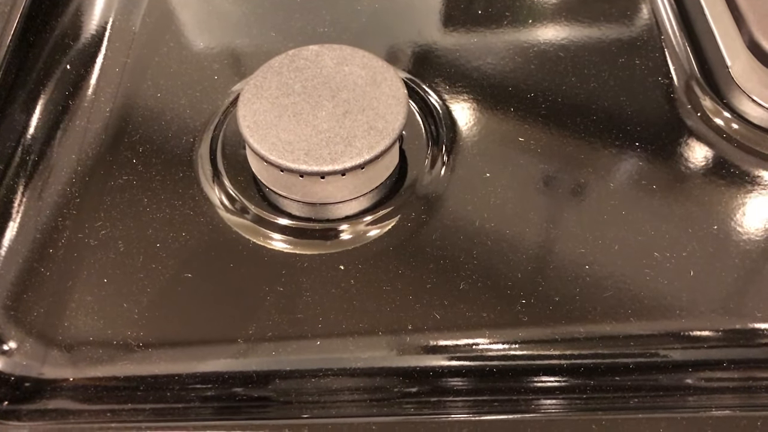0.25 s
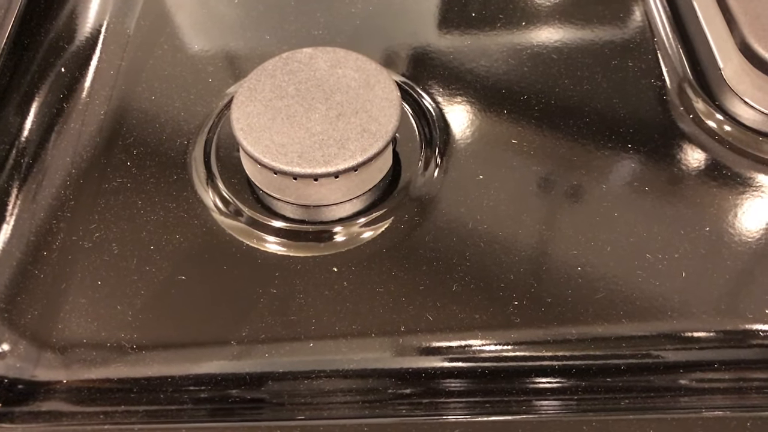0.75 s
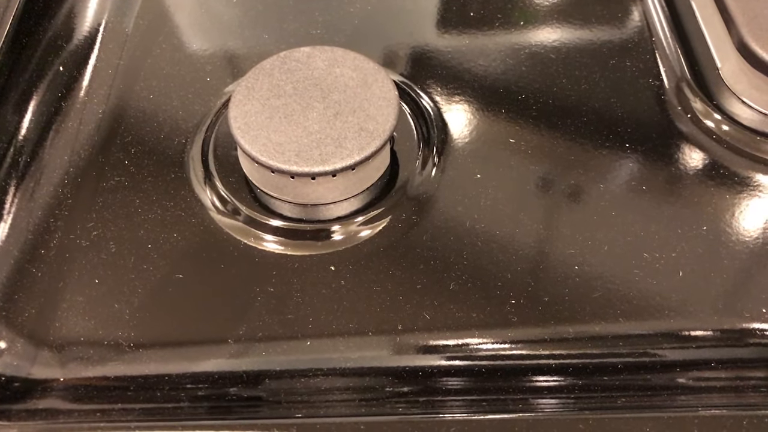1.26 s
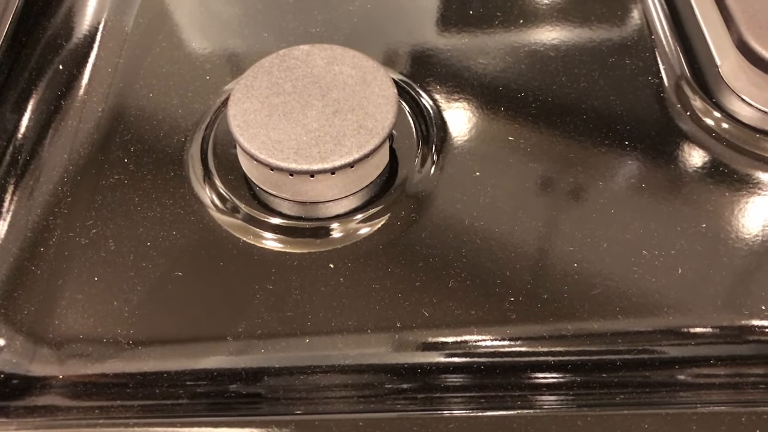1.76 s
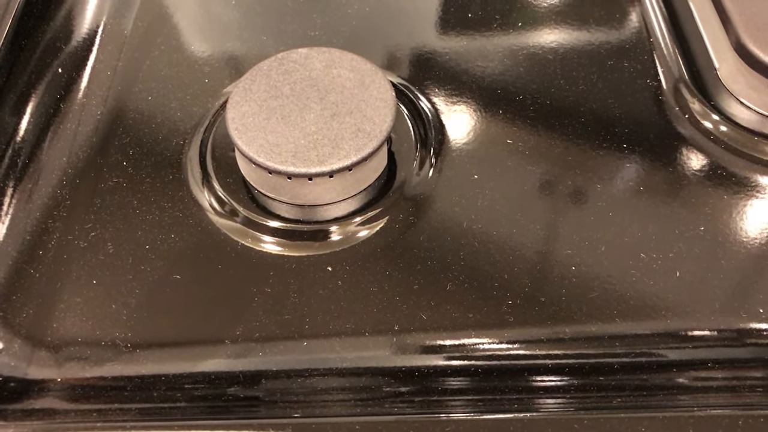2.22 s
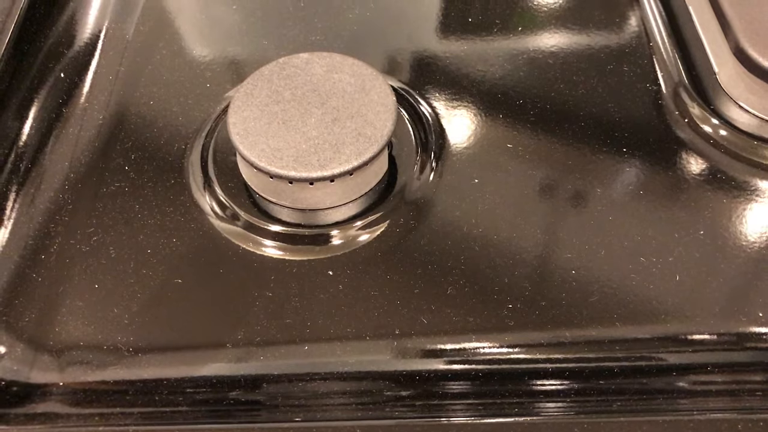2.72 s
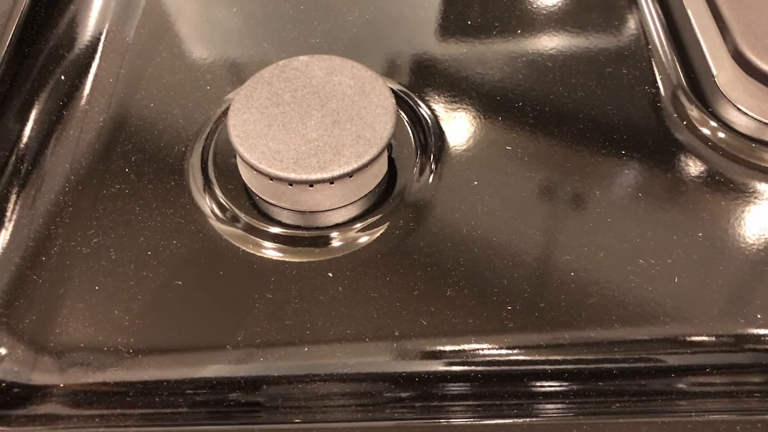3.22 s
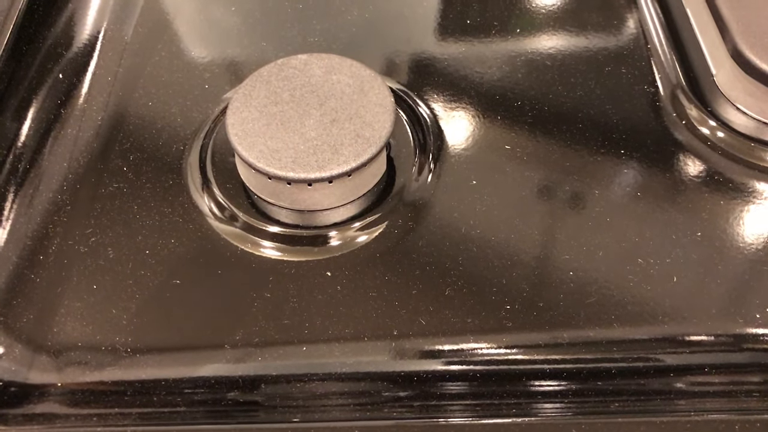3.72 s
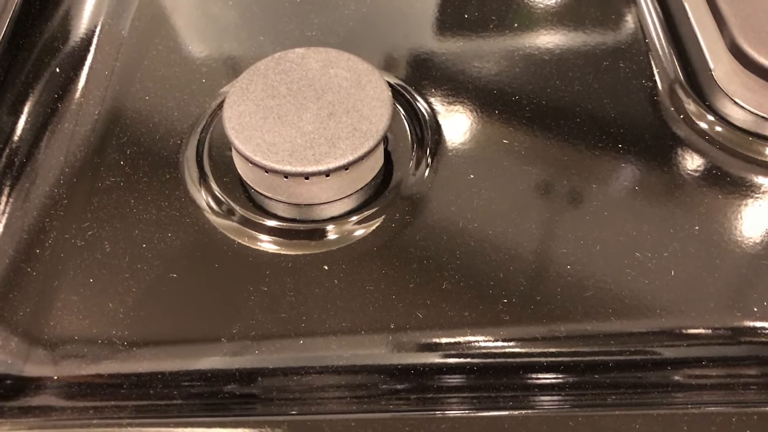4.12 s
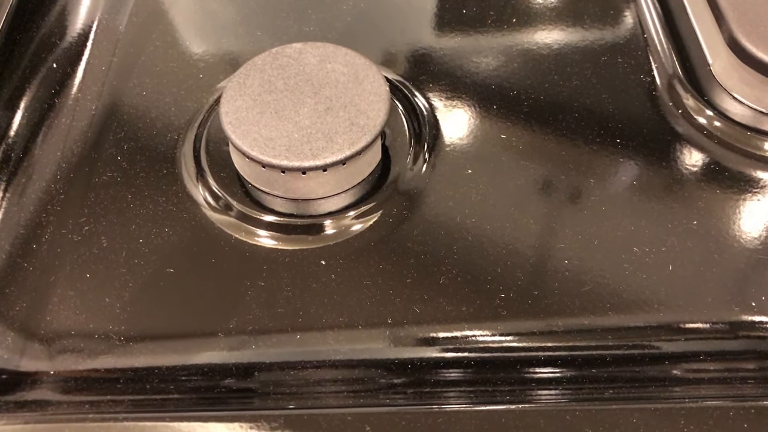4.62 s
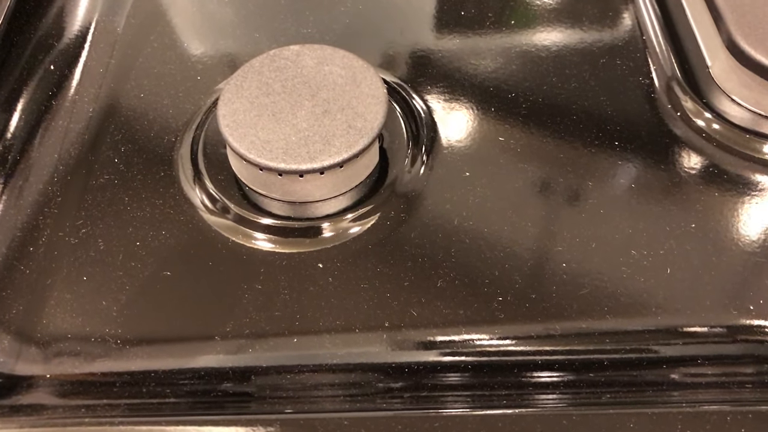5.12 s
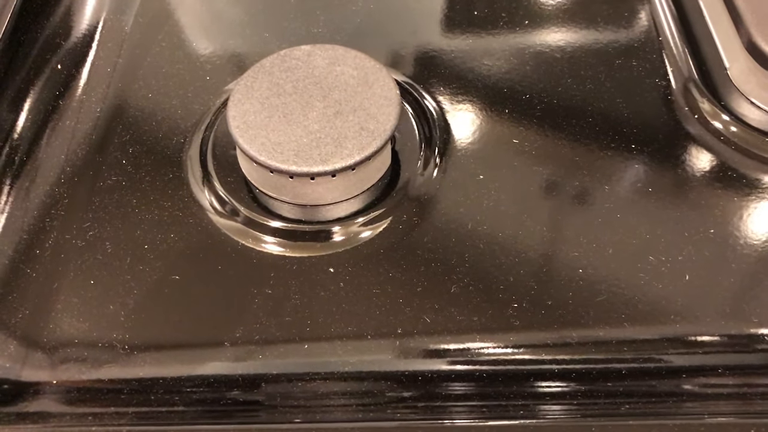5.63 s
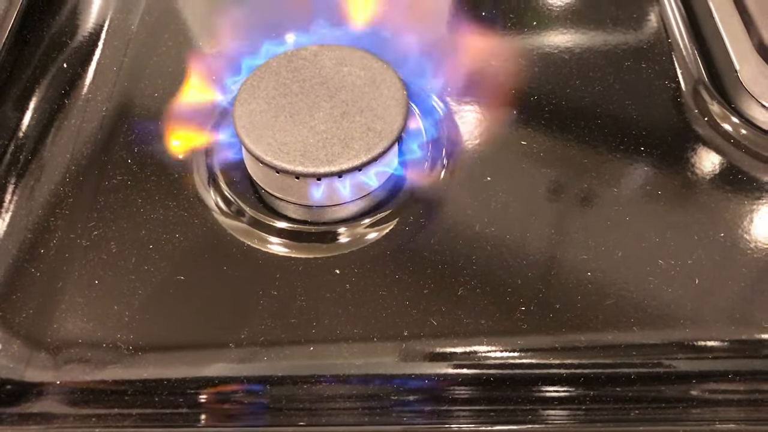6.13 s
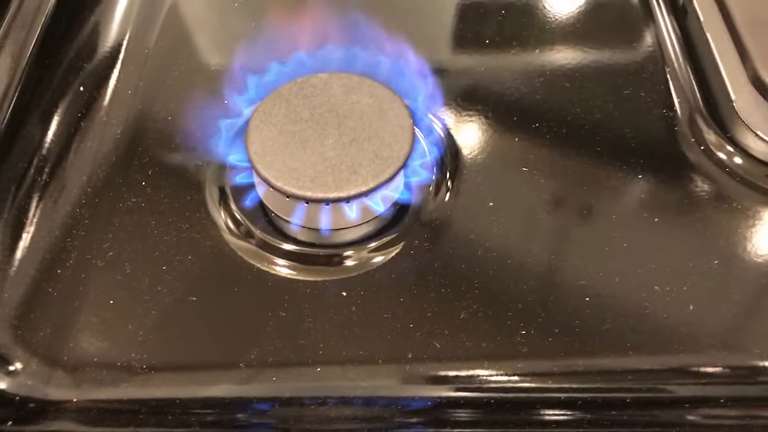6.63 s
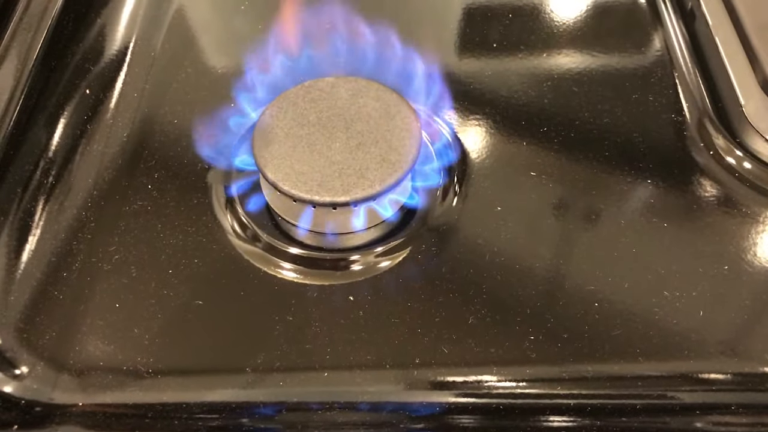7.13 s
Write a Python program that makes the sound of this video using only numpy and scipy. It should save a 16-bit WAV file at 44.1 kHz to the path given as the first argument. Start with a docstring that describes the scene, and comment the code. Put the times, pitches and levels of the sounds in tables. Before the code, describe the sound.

Sharp, quick spark ticks from a gas stove pause and resume, until the gas lights with a soft sputtering puff and a low rush.

```python
"""A hard-walled kitchen, one hand-held microphone close to a gas hob.
The igniter ticks six times a second, in two runs. Each spark cracks, bounces off the steel top
and rings on in the burner and the room. Gas slowly fills the line, catches with a soft sputtering
whoomp, and burns with a low flutter and a thin hiss. Under it lie room tone and a faint draught."""
import sys
import numpy as np
from scipy import signal
from scipy.fft import rfft, irfft, next_fast_len
from scipy.io import wavfile

SR = 44100
rng = np.random.default_rng(int(sys.argv[2]) if len(sys.argv) > 2 else 0)


def wrap_up_sound(samples):
    """Save the sound to the file named by the first command line argument, as 16-bit audio."""
    columns = np.atleast_2d(samples).T
    # keep every value between -1 and 1, then stretch to whole-number steps
    tamed = np.clip(columns, -1, 1)
    steps = np.round(tamed * 32767).astype(np.int16)
    wavfile.write(sys.argv[1], SR, steps)


N = 324612
TIME, RING_TIME = np.arange(N) / SR, np.arange(SR // 2) / SR
CATCH_S = 6.089  # the gas catches


def igniter(crack_db=10, room_db=7.5, lit_db=-0.2, air_puff_db=-26, gas_puff_db=-10, lit_puff_db=-3,
            wander=0.099, air_smear=0.121, lit_smear=0.5, sway_hz=0.097):
    """Sparks at close range: each arc takes a slightly different path, and richer gas puffs more."""
    # colour of the sound scattered round the kitchen: f/Hz, level/dB
    scatter = [(150, -37.5), (400, -39), (700, -21.5), (1500, -19), (2200, -14.5), (2900, -11), (3700, -11),
               (4500, -3.5), (5400, -3.5), (6300, -1), (8800, -1.5), (10000, 1.5), (12000, -2.5),
               (14600, -5), (15500, -15.5)]
    snap, ring, push = gain_of(crack_db) * crack(), burner_ring(), puff()
    tail_a, tail_b = (gain_of(room_db) * unit(coloured(room_tail(), scatter)) for _ in range(2))
    out = np.zeros(N)
    for s, db in sparks():
        lit = s > CATCH_S  # the flame's hot, moving air smears the snap and leaves less gas to puff
        direct = gain_of(lit_db * lit) * smeared(snap, lit_smear if lit else air_smear)
        turn = 2 * np.pi * sway_hz * s  # the microphone drifts through the room's echo pattern
        response = direct + ring + np.cos(turn) * tail_a + np.sin(turn) * tail_b
        puff_db = air_puff_db + (gas_puff_db - air_puff_db) * gas_share(s) + lit_puff_db * lit
        tick = smeared(response, wander, taps=64) + gain_of(puff_db) * push
        add(out, s, gain_of(db) * tick)
    return out


def sparks(recharge_s=0.16745, first_lag_s=0.0014):
    """Time and level of each spark: one per recharge, the first recharge of a burst a little longer."""
    # bursts of up to five sparks: start t/s, spark count, level/dB
    bursts = [(0.5327, 1, -9.5), (0.713, 5, -10), (1.564, 5, -10), (2.3995, 3, -9.5), (3.6832, 5, -9.4),
              (4.5341, 5, -9.2), (5.3852, 5, -9), (6.236, 5, -9.5), (7.0874, 1, -9)]
    return [(start + k * recharge_s + first_lag_s * (k > 0), db)
            for start, count, db in bursts for k in range(round(count))]


def crack(snap_db=-4):
    """The arc snaps and the gap under the burner cap rings briefly; both arrive by a few short paths."""
    # paths to the microphone, round the cap and off the hob: delay t/s, ring level/dB, snap level/dB
    paths = [(.0005, -5, -8.5), (.0009, 4, 15), (.0012, -15.5, -3), (.0017, 10.5, -11), (.0025, -13.5, -25),
             (.0036, -7, -22), (.0055, 6, -23), (.0059, 1.5, 2), (.0074, 1.5, -16.5)]
    # resonances of the gap under the cap: f/Hz, width/Hz, level/dB
    gap_modes = [(2040, 170, -6.5), (2447, 200, -13.5), (2862, 59, 3.5), (4080, 150, -4), (4370, 430, 2),
                 (5450, 480, 1.5), (6514, 360, 12.5), (7070, 423, 11.5), (8000, 170, 1), (8310, 330, 12),
                 (9580, 320, 12), (10420, 490, 10), (11960, 1370, 5.5), (13760, 1100, 5), (15850, 620, 5.5)]
    # colour of the bare snap: f/Hz, level/dB
    snap_colour = [(150, -36), (400, -24.5), (720, -9.5), (1200, -28.5), (2000, -11.5), (2800, -9),
                   (4200, -8), (7000, -5), (11500, 0), (16000, -29)]
    ring_arrivals, snap_arrivals = np.zeros((2, len(RING_TIME)))
    for delay, ring_db, bright_db in paths:
        add(ring_arrivals, delay, gain_of([ring_db]))
        add(snap_arrivals, delay, gain_of([bright_db]))
    t = RING_TIME[:SR // 50]
    gap = sum((-1) ** k * gain_of(db) * width * np.exp(-np.pi * width * t) * np.sin(2 * np.pi * hz * t)
              for k, (hz, width, db) in enumerate(gap_modes))
    ring = unit(signal.fftconvolve(ring_arrivals, gap)[:len(RING_TIME)])
    snap = unit(coloured(snap_arrivals, snap_colour))
    return unit(ring + gain_of(snap_db) * snap)


def burner_ring(t60_s=0.23):
    """The metal rings faintly after the snap."""
    # long modes of the burner and its steel top: f/Hz, level/dB
    modes = [(4727, -62.5), (6223, -61.5), (6449, -62.5), (6821, -116.5), (7117, -54.5), (7553, -56.5),
             (8118, -49), (8339, -80.5), (8414, -55), (8640, -49.5), (9022, -56), (9728, -47),
             (9798, -75.5), (9911, -57.5), (10115, -71.5), (10287, -69), (10492, -73), (10960, -48.5),
             (12032, -68.5), (12699, -61.5)]
    ring = sum(gain_of(db) * np.sin(2 * np.pi * (hz * RING_TIME + rng.random())) for hz, db in modes)
    return unit(ring * gain_of(-60 * RING_TIME / t60_s))


def puff(echo_db=-4, t60_s=0.043):
    """Gas heated by the spark swells: one soft push and its echoes off the hob."""
    # hollow colour of the puff: f/Hz, level/dB
    colour = [(100, -32.5), (330, -11.5), (430, -5.5), (560, -10.5), (740, 9.5), (950, -5.5), (1600, -10.5),
              (2400, -18.5), (4000, -22.5)]
    decay = gain_of(-60 * RING_TIME / t60_s)
    arrivals = gain_of(echo_db) * unit(rng.standard_normal(len(RING_TIME)) * decay)
    arrivals[0] += 1  # the direct push
    return unit(coloured(arrivals, colour))


def flame(burn_db=-49.5, stand_s=6.26, room_db=-6):
    """A deep whoomp as the pooled gas flares off, a short lull, then the ring of flames stands up."""
    # three quick surges of the flare: t/s, level/dB
    surges = [(6.087, -45), (6.122, -43.5), (6.176, -43.5)]
    # spectrum of the whoomp: f/Hz, level/dB
    whoomp_colour = [(30, -5), (65, -12), (100, -2.5), (135, 5), (200, 1), (240, -18), (280, 8.5),
                     (365, -30), (510, -3.5), (700, -3), (900, -14.5), (1350, -11), (1700, -26),
                     (3000, -26), (8000, -43)]
    # spectrum of the settled flame: f/Hz, level/dB
    settled_colour = [(30, -20), (90, -5.5), (135, 4.5), (215, -0.5), (250, -2.5), (290, -0.5), (365, -5),
                      (510, 2.5), (610, -4.5), (730, 1.5), (900, -8), (1300, -8), (1800, -20.5),
                      (3000, -22), (8000, -51)]
    drive = turbulence()
    flare_power = sum((gain_of(db) * envelope(s, attack_s=0.008, hold_s=0.021, fall_db_per_s=220)) ** 2
                      for s, db in surges)
    whoomp = np.sqrt(flare_power) * evened(coloured(drive, whoomp_colour))
    settled = gain_of(burn_db) * envelope(stand_s, attack_s=0.16, hold_s=0, fall_db_per_s=1.7)
    burn = whoomp + settled * evened(coloured(drive, settled_colour))
    return burn + gain_of(room_db) * signal.fftconvolve(burn, room_tail())[:N]


def turbulence(pops_per_s=550, spread_db=4, roar_db=-5):
    """Flamelets pop at the ports over a turbulent roar."""
    sizes = gain_of(spread_db * np.minimum(rng.exponential(1, N), 3.5))
    crackle = sizes * (rng.random(N) < pops_per_s / SR)
    return evened(crackle - crackle.mean()) + gain_of(roar_db) * rng.standard_normal(N)


def pops(decay_s=0.00029):
    """A pocket of gas burns at once: a quick push of air and a shallow suck behind it."""
    # the flame's largest pops: t/s, peak level/dB
    pockets = [(6.0991, -34), (6.133, -31), (6.182, -32), (6.1919, -31.5), (7.2433, -35)]
    age = RING_TIME[:SR // 100] / decay_s
    push = age * (1 - age / 2) * np.exp(-age)
    out = np.zeros(N)
    for s, db in pockets:
        add(out, s - decay_s / 2, gain_of(db) * push / push.max())
    return out


def jet(hiss_db=-63, whistle_db=-65, start_s=5.2, rise_s=0.45, whistle_rise_s=2.2):
    """The jet hisses once gas has pushed the air out of the line; its whistle builds more slowly."""
    # spectrum of gas rushing through the jet: f/Hz, level/dB
    hiss_colour = [(1000, -14), (3000, -1.5), (4500, -6), (7000, 3), (9500, -7), (11500, -4), (14000, -4),
                   (16000, -14)]
    # whistling resonances of the jet: f/Hz, width/Hz, level/dB
    modes = [(7240, 350, -6), (9950, 380, 10), (13700, 600, -10)]
    hz = np.fft.rfftfreq(N, 1 / SR)
    peaks = sum(gain_of(db) / (1 + (2 * (hz - centre) / width) ** 2) for centre, width, db in modes)
    whistle = evened(irfft(rfft(rng.standard_normal(N)) * peaks, N))
    whistle *= np.clip((TIME - start_s) / whistle_rise_s, 0, 1)
    hiss = noise(hiss_colour) * np.clip((TIME - start_s) / rise_s, 0, 1)
    return gain_of(hiss_db) * hiss + gain_of(whistle_db) * whistle


def purge(air_hz=2880, gas_hz=3100, width_hz=190, start_db=-86, grow_db_per_s=2.5):
    """Flow noise in a burner-tube resonance: it climbs as gas replaces air, and grows until the catch."""
    hz = air_hz + (gas_hz - air_hz) * gas_share(TIME)
    db = start_db + grow_db_per_s * np.minimum(TIME, CATCH_S)
    flow = rng.standard_normal(N) + 1j * rng.standard_normal(N)
    flutter = signal.lfilter([1], [1, -np.exp(-np.pi * width_hz / SR)], flow)
    tone = np.exp(2j * np.pi * np.cumsum(hz) / SR)
    return gain_of(db) * evened((flutter * tone).real)


def gas_share(s, half_gas_s=4.5, fill_s=0.56):
    """Gas gradually replaces the air in the line: 0 = all air, 1 = all gas, at time s."""
    return 1 / (1 + np.exp((half_gas_s - s) / fill_s))


def room_tail(build_s=0.0008, wall_s=0.018, wall_spread_s=0.0027, wall_db=-3):
    """Dense reflections build quickly, bunched once by the back wall; each band dies at its own rate."""
    # ring time of the kitchen: f/Hz, t60/s
    ring_times = [(400, 0.27), (2000, 0.43), (4500, 0.4), (7500, 0.5), (10000, 0.38), (13000, 0.28),
                  (16000, 0.32)]
    hz, t, bands = signal.stft(rng.standard_normal(len(RING_TIME)), SR, nperseg=256)
    decay = gain_of(-60 * t / read(ring_times, hz)[:, None])
    tail = signal.istft(bands * decay, SR, nperseg=256)[1][:len(RING_TIME)]
    wall = gain_of(wall_db) * np.exp(-((RING_TIME - wall_s) / wall_spread_s) ** 2)
    return unit(tail * (1 - np.exp(-RING_TIME / build_s) + wall))


def background(floor_db=-60, draught_db=-47, gust_db=-35.5):
    """Low room tone, and air drifting over the microphone, with a gust as the gas catches."""
    # steady rush of the room and the open line: f/Hz, level/dB
    room_tone = [(25, 9.5), (48, 13), (70, -7), (110, 4.5), (135, -3), (215, 2.5), (400, -2), (700, -2),
                 (1100, -5.5), (1500, -15.5), (2300, -23.5), (4000, -26), (10000, -27.5), (16000, -32.5)]
    # rumble of the draught on the microphone: f/Hz, level/dB
    draught_colour = [(1, -6), (5, 3), (9, -2), (20, -13.5), (32, -29), (70, -53), (200, -93.5)]
    gust = gain_of(gust_db) * envelope(CATCH_S, attack_s=0.03, hold_s=0.2, fall_db_per_s=22)
    return gain_of(floor_db) * noise(room_tone) + (gain_of(draught_db) + gust) * noise(draught_colour)


def gain_of(db):
    """Decibels to a factor."""
    return 10 ** (np.asarray(db) / 20)


def evened(x):
    """Scales to rms 1."""
    return x / np.sqrt(np.mean(x ** 2) + 1e-20)


def unit(x):
    """Scales to energy 1."""
    return x / np.linalg.norm(x)


def read(points, hz):
    """Interpolates a table on a log-frequency axis."""
    f, value = np.transpose(points)
    return np.interp(np.log(hz + 1), np.log(f + 1), value)


def add(mix, s, sound):
    """Mixes a sound in at time s."""
    part = mix[round(s * SR):][:len(sound)]
    part += sound[:len(part)]


def coloured(x, points):
    """Causal, minimum-phase filter with the given spectrum."""
    size = 2 * next_fast_len(len(x))
    log_gain = np.log(gain_of(read(points, abs(np.fft.fftfreq(size, 1 / SR)))))
    response = np.exp(np.conj(signal.hilbert(log_gain)))[:size // 2 + 1]
    return irfft(rfft(x, size) * response, size)[:len(x)]


def noise(points):
    """Steady noise of rms 1 with the given spectrum."""
    return evened(coloured(rng.standard_normal(N), points))


def envelope(start_s, attack_s, hold_s, fall_db_per_s):
    """A straight rise, then an exponential release from hold_s after the start."""
    age = TIME - start_s
    return np.clip(age / attack_s, 0, 1) * gain_of(-fall_db_per_s * np.maximum(age - hold_s, 0))


def smeared(x, share, taps=110):
    """Spreads part of a sound over random, slightly longer paths."""
    arrivals = unit(np.r_[1, share * unit(rng.standard_normal(taps))])
    return signal.fftconvolve(x, arrivals)[:len(x)]


def scene():
    """Sparks, flame, gas flow and kitchen at one close microphone."""
    return (igniter() + flame() + pops() + jet() + purge() + background())[None]


def record(dry):
    """The recorder's band limit: a steep low-pass at 16 kHz."""
    low_pass = signal.firwin(301, 16000, window=("kaiser", 9), fs=SR)
    return signal.oaconvolve(dry, low_pass[None], "same")


dry = scene()
out = record(dry)
wrap_up_sound(out)
```